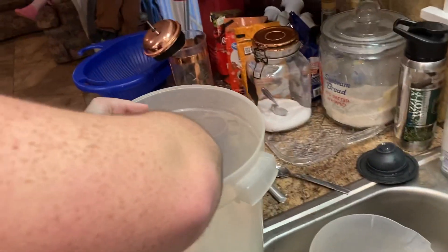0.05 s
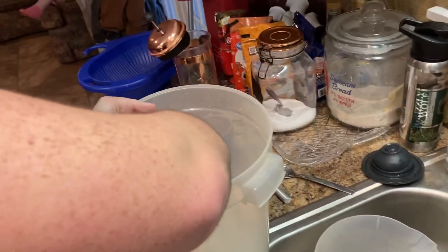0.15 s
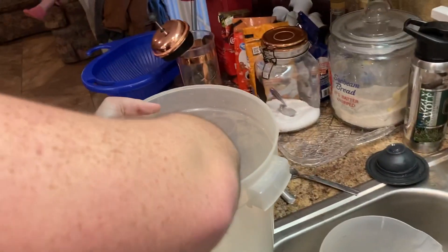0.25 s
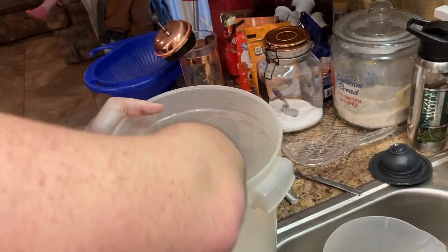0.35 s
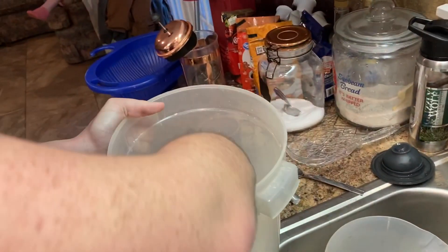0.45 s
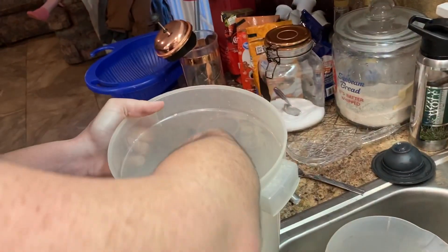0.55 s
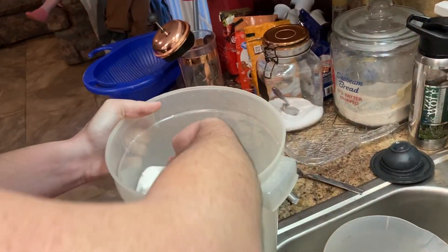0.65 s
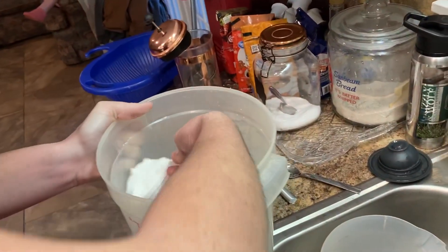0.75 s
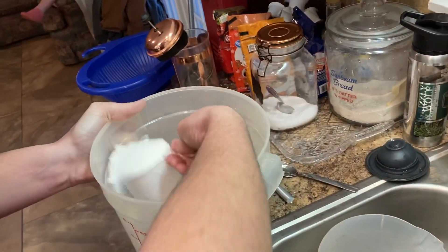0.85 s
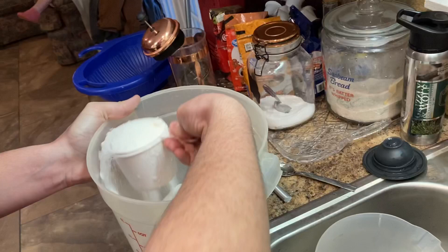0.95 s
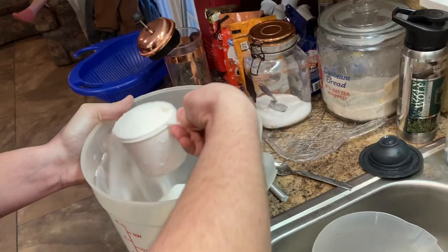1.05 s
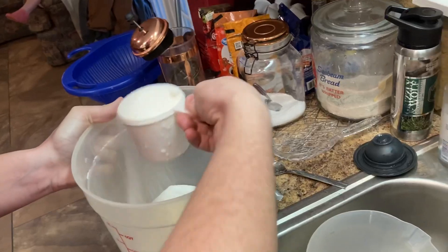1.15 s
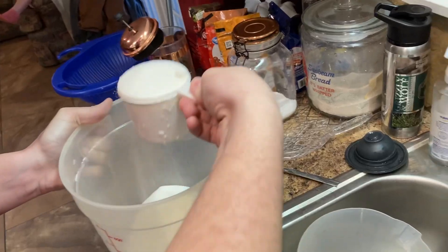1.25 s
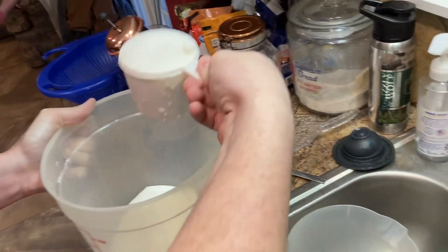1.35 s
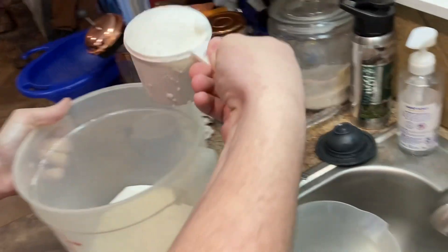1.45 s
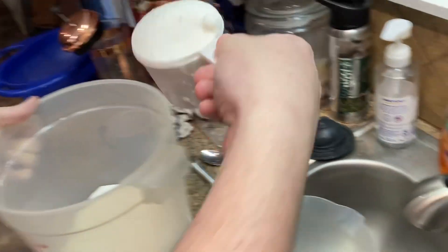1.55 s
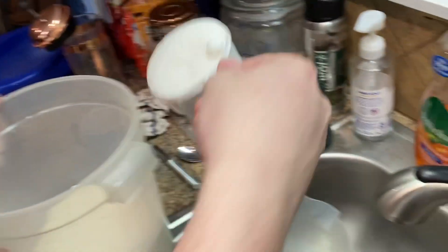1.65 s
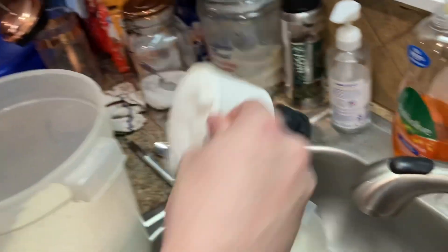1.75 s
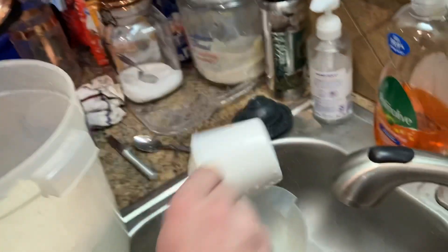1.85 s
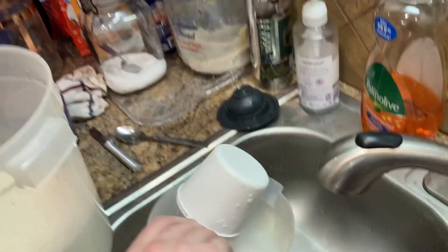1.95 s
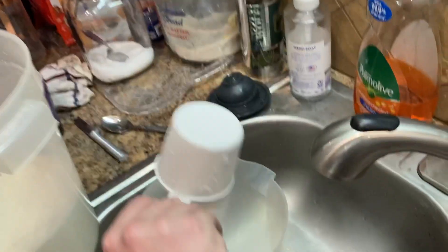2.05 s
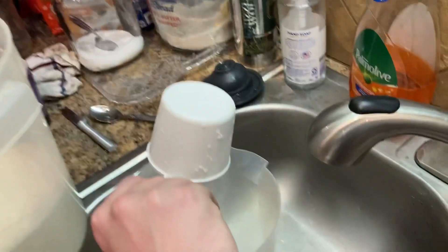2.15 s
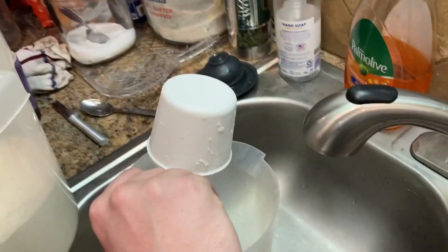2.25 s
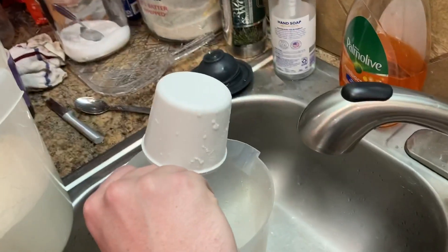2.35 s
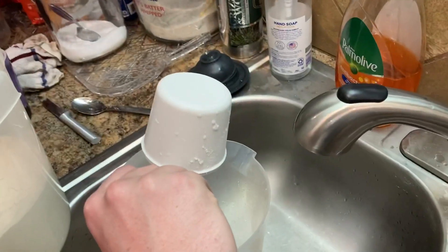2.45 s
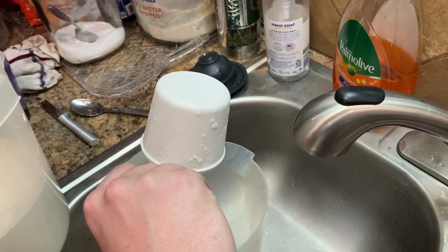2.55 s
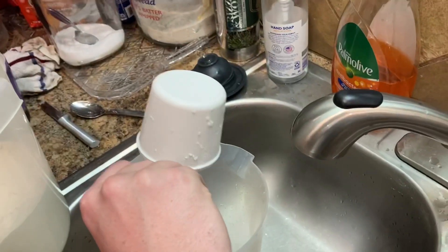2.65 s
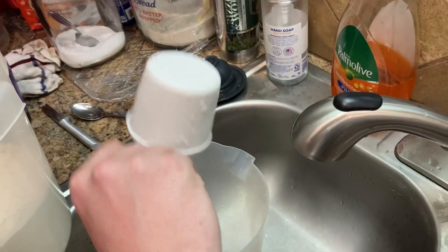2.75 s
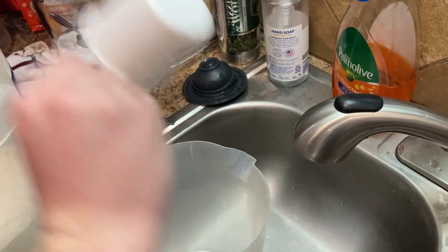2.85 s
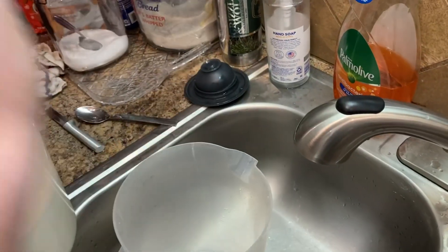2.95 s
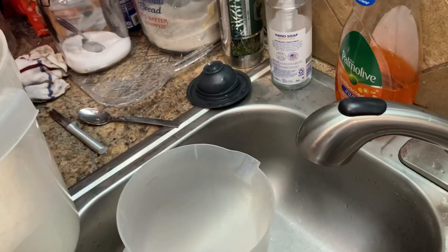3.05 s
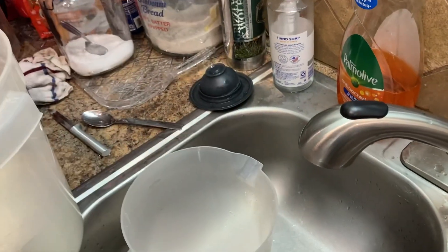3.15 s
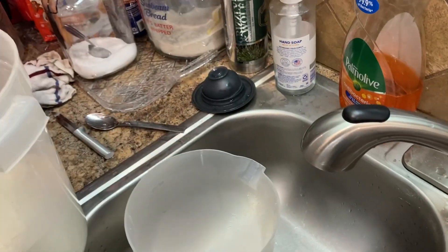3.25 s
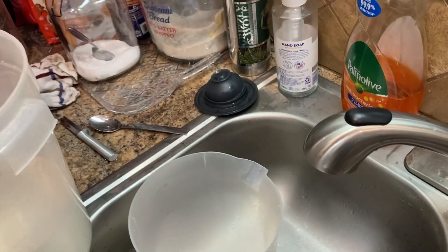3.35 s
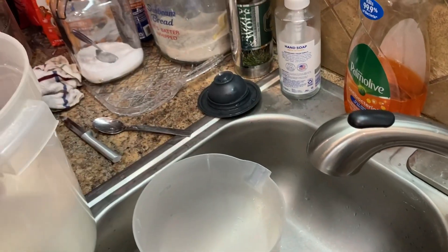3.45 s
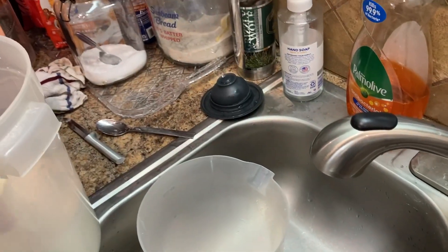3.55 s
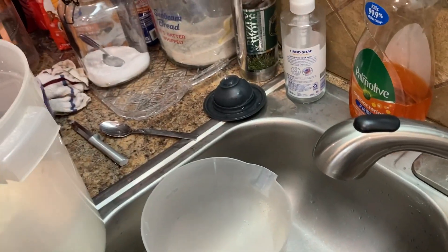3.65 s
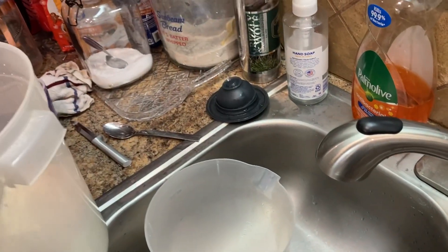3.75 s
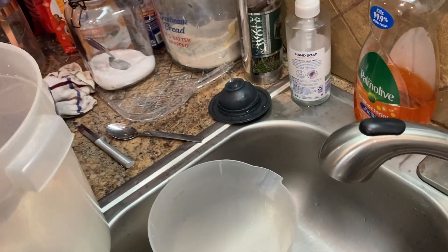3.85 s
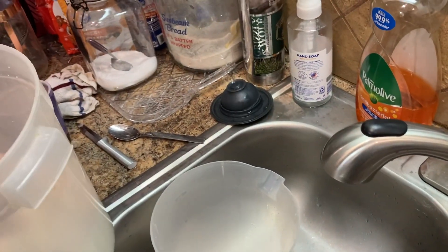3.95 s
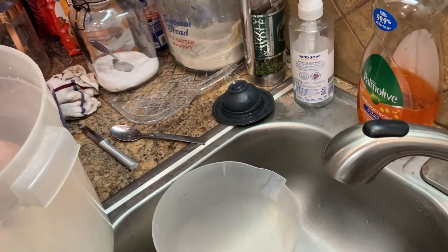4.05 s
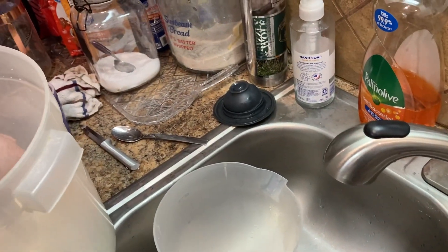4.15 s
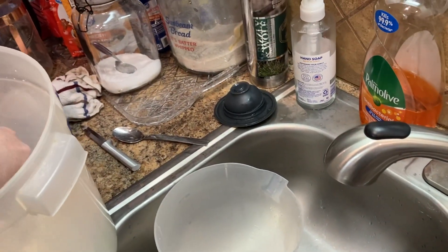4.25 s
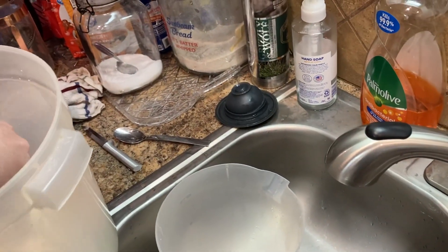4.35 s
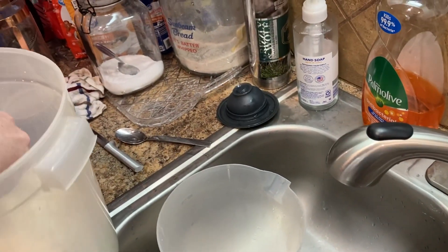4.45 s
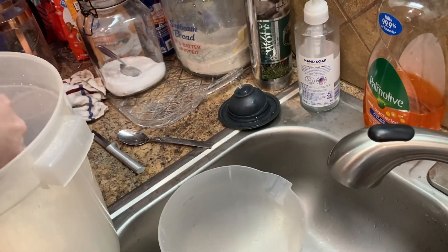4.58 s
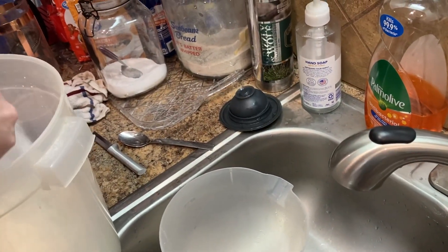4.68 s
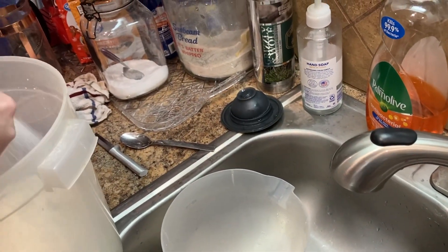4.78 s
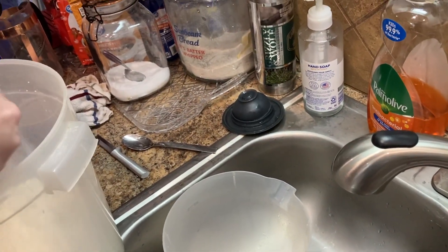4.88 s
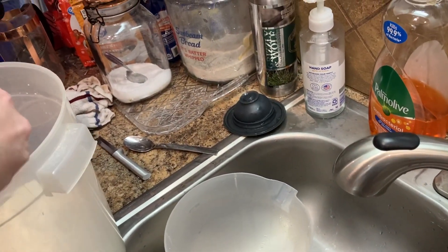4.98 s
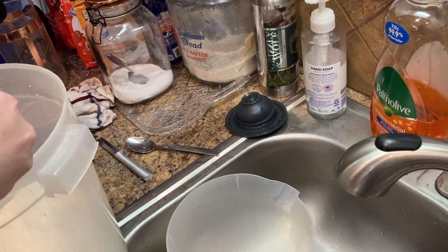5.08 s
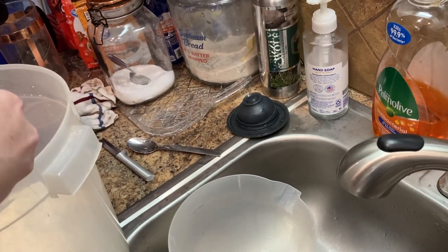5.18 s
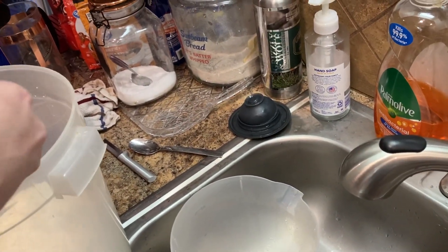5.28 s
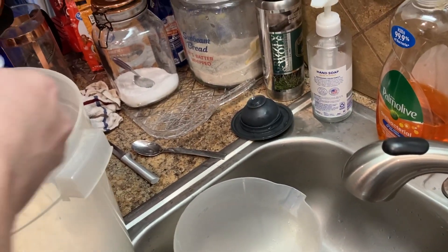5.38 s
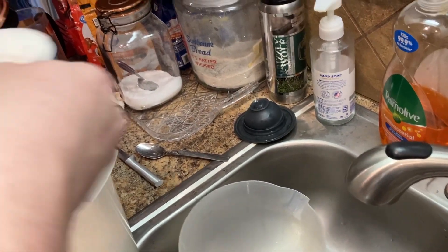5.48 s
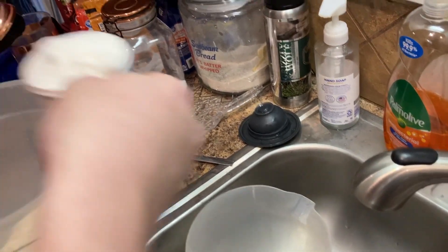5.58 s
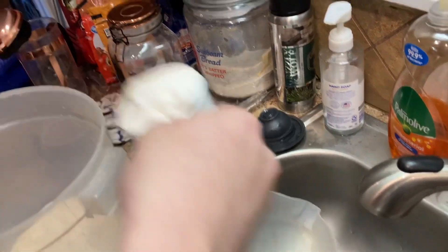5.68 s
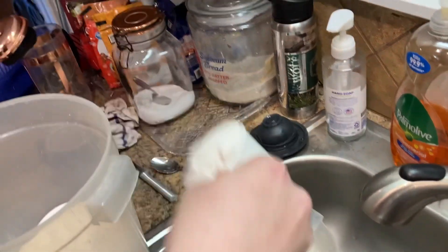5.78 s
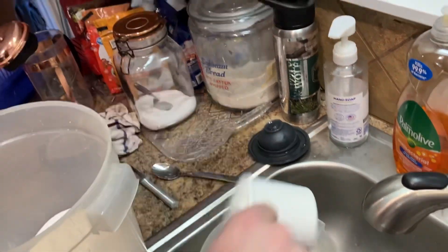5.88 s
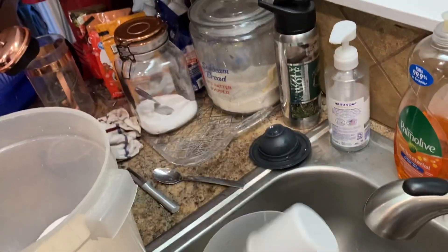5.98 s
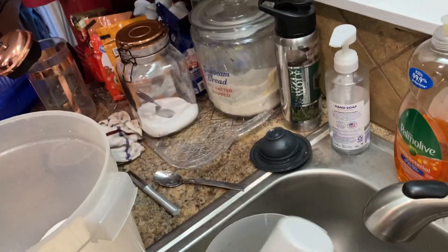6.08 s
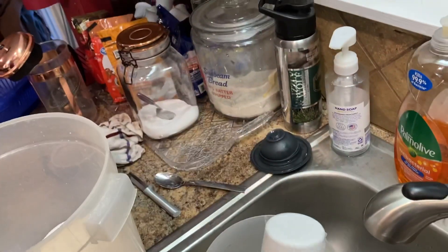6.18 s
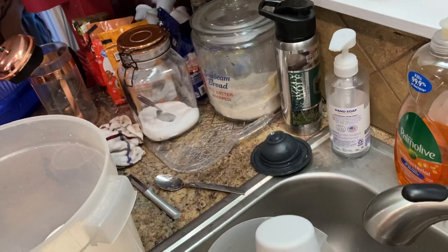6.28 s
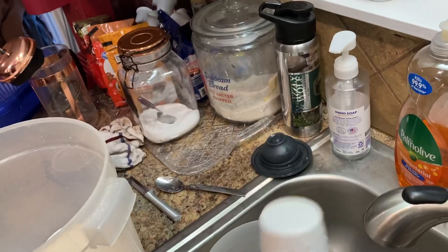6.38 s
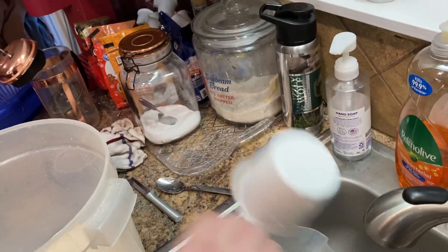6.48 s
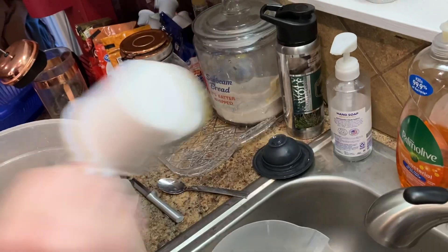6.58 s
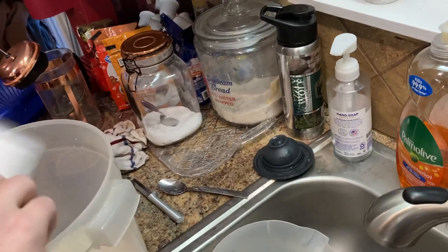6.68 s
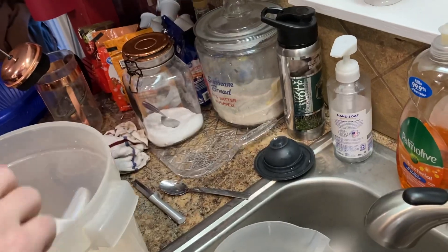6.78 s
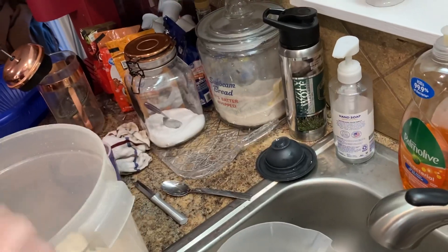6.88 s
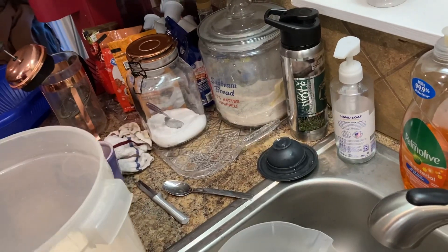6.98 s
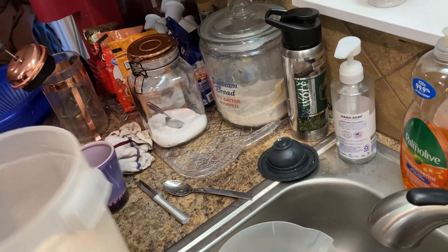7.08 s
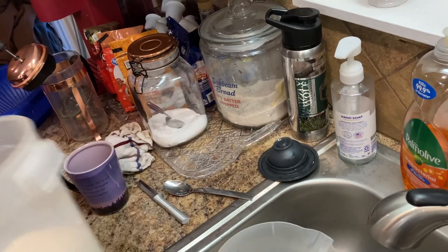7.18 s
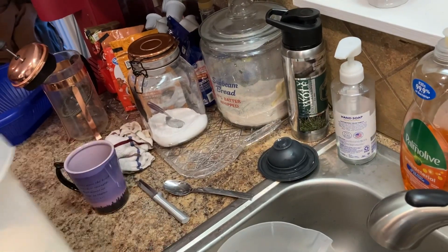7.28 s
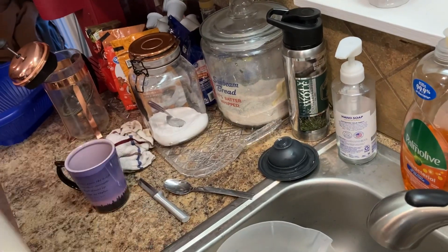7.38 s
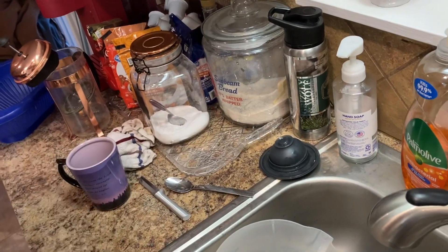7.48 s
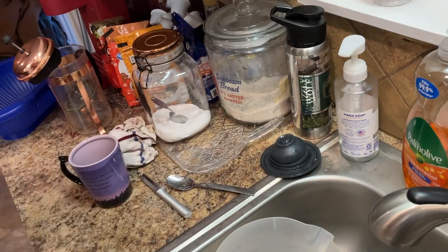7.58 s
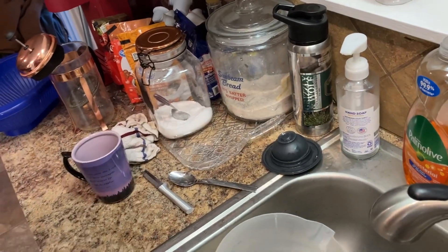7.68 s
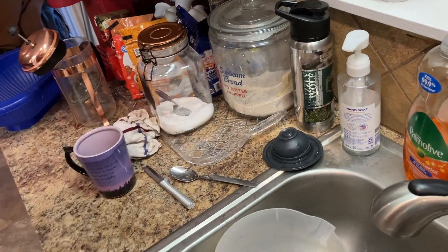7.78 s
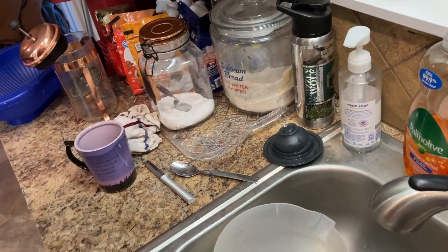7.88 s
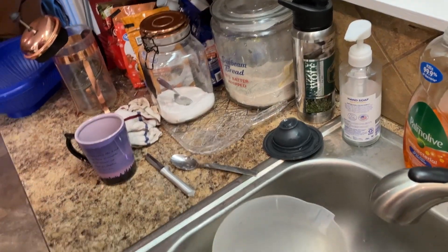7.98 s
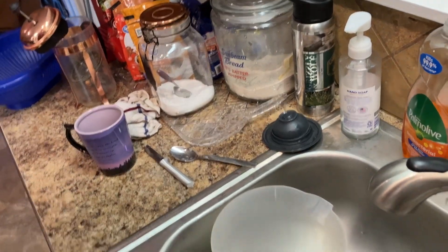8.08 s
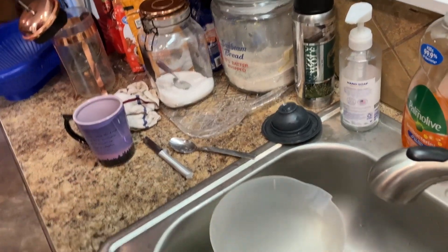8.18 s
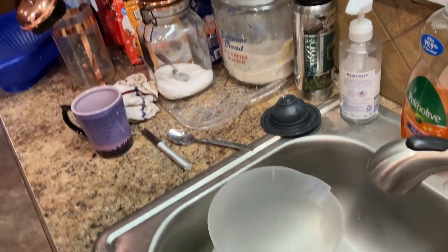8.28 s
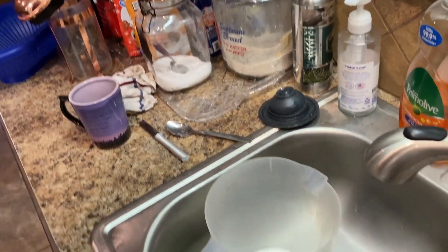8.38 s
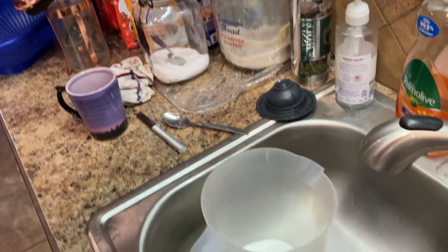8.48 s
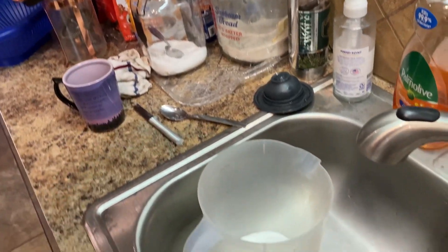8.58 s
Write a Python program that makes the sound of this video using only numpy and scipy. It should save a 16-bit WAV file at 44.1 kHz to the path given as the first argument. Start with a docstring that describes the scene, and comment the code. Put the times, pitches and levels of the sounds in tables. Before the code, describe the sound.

In a small kitchen with a soft refrigerator hum, a plastic cup crunches through granulated sugar in a large plastic tub, knocks its wall, then tips a hissing clump into a plastic pitcher, tapping its rim. A second, sharper scoop grinds with a gliding hollow note, knocks and pours again. The cup clatters loudly into the tub, which is pushed aside in brief pitched scuffs. Close stereo microphone, short room echo.

```python
"""A plastic cup digs granulated sugar out of a big plastic tub and tips it into a pitcher in a steel sink.
Grains are random tiny impacts, coloured or ringing the plastic: they hiss, crunch and slide off in clumps.
The cup knocks and rubs on the rims (snaps and rings) and the tub thumps on the counter (low damped tones).
At the end the cup is dropped into the tub and the tub is slid aside, in short bursts of pitched scuffs.
Echoes of a small kitchen surround it all, and steady tones and soft noise hum behind."""
import sys
import numpy as np
from scipy import signal
from scipy.fft import rfft, irfft, next_fast_len
from scipy.io import wavfile
from scipy.ndimage import map_coordinates

SR = 44100
rng = np.random.default_rng(int(sys.argv[2]) if len(sys.argv) > 2 else 0)


def put_to_file(sound):
    """Save the sound as 16-bit audio at rate SR, in the file named by the first command-line argument."""
    columns = np.atleast_2d(sound).T  # one column per channel
    safe = np.clip(columns, -1, 1)
    whole_steps = np.round(safe * 32767)
    wavfile.write(sys.argv[1], SR, whole_steps.astype(np.int16))


N = 380578  # length of the scene in samples

# Event levels below are those before the small gain in scene().
# pushes of the cup through the sugar: [full strength t/s, hold/s, rise/s, crunch level/dB, fizz level/dB]
DIG_STROKES = [(0.17, 0.05, 0.17, -46, -51), (0.37, 0.088, 0.077, -48, -50), (0.57, .15, 0.32, -48, -48),
               (0.8, 0.18, .1, -58.5, -67.5), (3.25, 0.006, 0.012, -49.5, -41),
               (3.355, 0.029, 0.064, -41, -40), (3.45, 0.31, 0.13, -45, -45),
               (3.92, 0.075, 0.16, -48, -55.5), (4.11, 0.185, 0.11, -46, -45.5),
               (4.4, 0.015, 0.01, -49.5, -57), (4.47, .05, 0.03, -54, -59.5), (4.8, 0.14, 0.33, -73.5, -80)]
# pushes hard enough to sound the cup's hollow note: [full strength t/s, hold/s, rise/s, level/dB]
HOLLOW_STROKES = [(.15, 0.12, 0.13, -55.5), (.56, 0.2, .1, -50), (3.355, 0.038, 0.018, -34),
                  (3.405, 0.01, 0.011, -38), (3.46, .06, .05, -44), (3.545, 0.041, .06, -39.5),
                  (3.705, 0.027, 0.074, -40.5), (3.92, .15, 0.11, -53), (4.09, 0.23, 0.11, -47.5),
                  (4.4, 0.015, 0.012, -44), (4.475, 0.038, 0.025, -52)]
# the hollow note sinks as the cup buries itself, rises as it comes free, drops as it is levelled: [t/s, f/Hz]
HOLLOW_GLIDE = [(.2, 1726), (3.352, 1996), (3.41, 1698), (3.561, 1050), (3.71, 385.2), (3.8, 382),
                (3.87, 1949), (4.301, 2285), (4.39, 756), (4.471, 1159), (4.529, 1208)]
# cluster of tones around the hollow note: [multiple of its pitch, level/dB]
HOLLOW_CLUSTER = [(.57, -3), (1, 0), (1.3, -6)]
# the cup brushes a plastic rim: [full strength t/s, hold/s, rise/s, rasp level/dB, rim ring level/dB]
BRUSH_STROKES = [(2.038, .014, 0.024, -45.5, -58), (4.316, 0.024, .02, -43, -51),
                 (4.512, 0.0056, 0.026, -49.5, -63), (5.038, 0.0079, 0.017, -48, -48.5)]
# loose sugar running off the cup: [full flow t/s, hold/s, rise/s, patter level/dB, fizz level/dB]
POUR_STROKES = [(1.32, 0.19, 0.12, -47.5, -69.5), (1.54, 0.11, 0.074, -41.5, -59.5),
                (1.88, 0.055, 0.097, -55, -43.5), (1.96, 0.15, 0.17, -54, -52.5),
                (2.87, 0.44, 0.12, -66.5, -80), (5.47, 0.13, 0.14, -67, -81),
                (5.858, 0.0176, 0.043, -65, -53.5), (5.93, .03, 0.032, -75, -55),
                (5.98, 0.035, .03, -48.5, -45.5), (6.06, .06, .04, -67, -56), (6.18, 0.011, 0.04, -57, -53)]
# clumps letting go and landing: [t/s, level/dB, rise/s, time to fall 60 dB/s,
# cup ring level/dB before a 2 dB lift, tub ring level/dB, pitcher ring level/dB]
CLUMP_FALLS = [(0.477, -32.5, 0.0056, 0.29, 2.5, -15, -30), (1.031, -49.5, 0.017, 0.3, -16, -2, -5),
               (1.189, -29.5, 0.013, .24, -15, 8, -27), (2.202, -32, 0.0028, 0.083, -22, -34, -23),
               (2.417, -30.5, 0.0098, 0.38, -23, -30, 3.5), (3.226, -40, .0058, 0.25, -31, 3, -28),
               (5.967, -35.5, 0.0029, 0.089, -18, -28.5, -10.5),
               (6.621, -33.5, 0.012, 0.2, -21.5, 12.5, -25)]
# hard plastic contacts: [t/s, level/dB, tub body level/dB, time for the chatter to fall 60 dB/s,
# rim ring level/dB, rim f/Hz]
CONTACTS = [(0.671, -22, -5, 0.043, -6, 1700), (0.744, -33.5, -15, .015, -1.5, 1980),
            (0.902, -42.5, -12.5, .03, -14, 2300), (2.0073, -29.5, -6.5, .015, -7, 1580),
            (2.067, -21, -13, 0.044, -4.5, 1620), (2.123, -39, 3, 0.035, -3, 1628),
            (2.206, -29.5, -7, .06, 0.5, 1510), (3.405, -23, 5.5, 0.064, 1, 1450),
            (3.415, -28, 5.5, .04, 1.5, 1790), (4.2936, -13, -7, 0.012, -3, 2290),
            (4.2995, -21.5, -1.5, .03, 1, 1500), (4.396, -36, 8.5, 0.062, 3.5, 982),
            (4.415, -34.5, 5, .06, -7, 1050), (4.567, -35.5, -10, .035, -13, 2366),
            (5.775, -51.5, -12, 0.019, -10, 2300), (5.9701, -27.5, 1.5, 0.058, -10, 1400),
            (6.122, -34.5, -7, 0.028, -12, 2510), (6.568, -46, -5.5, 0.14, -5, 2400),
            (6.638, -13, 6.5, 0.04, -2.5, 2060), (6.646, -8.5, 0, 0.03, -3.5, 908),
            (6.652, -13.5, 2.5, .03, 2.5, 1255), (6.6987, -4.5, -5.5, 0.02, -12.5, 2410),
            (6.7016, -12, -1.5, .07, -11, 1950), (6.727, -16.5, -7.5, 0.15, -14.5, 2350),
            (6.7355, -25.5, -6, .08, -9, 2350), (6.8114, -6, -8, 0.028, 0.5, 2240),
            (8.241, -34, 5, 0.034, 3, 1050), (8.322, -33, 1, 0.061, 5, 1650),
            (8.588, -38, -1.5, .025, 7, 1050)]
# soft blows that flex the tub or the sink: [t/s, level/dB, lowest mode f/Hz, upper modes level/dB]
SOFT_BLOWS = [(0.502, -30.5, 111.4, -2), (0.532, -18, 106.7, -5), (1.912, -23.5, 112.6, -18),
              (1.957, -20.5, 82.3, -14.5), (1.983, -27.5, 52.1, -2), (2.062, -31.5, 75, -15),
              (2.16, -29.5, 106.3, -6), (2.275, -30.5, 129, -13), (3.237, -23.5, 326, -17),
              (4.396, -23, 140.4, -4), (4.4024, -13, 109.7, -9), (4.41, -26, 53.8, -3),
              (4.463, -47, 124, 5), (4.495, -38.5, 124, 2.5), (4.538, -21.5, 105, -18),
              (5.985, -26, 101.9, -6.5), (6.01, -30.5, 55, -18), (6.643, -21, 330, -24),
              (6.646, -16, 109, -20), (6.7, -18, 527, -19), (6.703, -27, 110.6, -5),
              (6.813, -21.5, 335, -9), (6.815, -27.5, 105.6, -11), (8.247, -30, 170.8, -19),
              (8.296, -31.5, 101.3, -5.5), (8.382, -29, 106, -4), (8.414, -25, 104.8, -8)]
# upper modes of a flexing wall, varied a little per blow: [multiple of the lowest mode, level/dB]
FLEX_MODES = [(1.45, -5), (2.0, 0), (3.0, -11)]
# shoves of the tub along the counter: [full strength t/s, hold/s, rise/s, level/dB, base pitch f/Hz]
SHOVES = [(8.217, 0.014, 0.043, -50.5, 1080), (8.245, .02, 0.0105, -43, 1034),
          (8.286, 0.016, .02, -46, 1044), (8.314, 0.022, .02, -41, 1025), (8.364, 0.0168, 0.011, -45, 1026),
          (8.584, .008, 0.008, -46, 1050)]

# resonances of the tub wall, varied a little per knock: [f/Hz, width/Hz, level/dB]
TUB_MODES = [(354, 130, 0), (521, 35, -4.5), (908, 75, 5.5), (1229, 52, 1.5), (1580, 520, -2.5),
             (2180, 530, 3), (2620, 34, -9.5), (3180, 55, -1.5), (3480, 70, -6), (3835, 90, -12),
             (4155, 50, -5.5), (4860, 2100, -25)]
# resonances of the tub when clumps land in it: [f/Hz, width/Hz, level/dB]
TUB_SPILL_MODES = [(564, 35, -2.5), (930, 120, 0), (1050, 100, 1), (1890, 130, -4), (2315, 70, 2.5),
                   (3590, 130, -2.5), (4950, 160, -6.5), (5800, 250, -11)]
# resonances of the cup: [f/Hz, width/Hz, level/dB]
CUP_MODES = [(920, 48, -5), (1400, 55, -7.5), (2640, 70, -5.5), (3150, 65, -9), (3840, 30, 5),
             (4760, 80, -6.5), (6100, 130, -2), (6470, 54, -4.5), (7130, 190, -2), (8090, 200, -6.5),
             (10100, 200, -6.5), (11650, 230, -8)]
# resonances of the pitcher: [f/Hz, width/Hz, level/dB]
PITCHER_MODES = [(975, 50, 9), (1193, 88, 2.5), (2300, 83, 5.5), (3295, 36, -5), (6500, 60, -6.5)]
# resonances of the tub's base: [multiple of its pitch, width/Hz, level/dB]
BASE_MODES = [(.45, 250, -13), (.88, 120, -5), (1, 110, 0), (1.1, 130, -3), (1.7, 450, -9)]
# close cluster in which a rim rings: [multiple of its pitch, width as a share of its pitch, level/dB]
RIM_MODES = [(.93, .07, -5), (1, .05, 0), (1.09, .06, -7)]

# colour of crunching and pattering sugar: [f/Hz, level per Hz/dB]
CRUNCH_COLOUR = [(150, -13.5), (400, 4), (680, 2.5), (950, 2), (1500, 2), (2300, 0.5), (3300, -9.5),
                 (5000, -13), (16000, -43.5)]
# colour of hissing grains: [f/Hz, level per Hz/dB]
FIZZ_COLOUR = [(500, -34.5), (2500, -3.5), (4200, -5), (6500, -0.5), (9500, -4.5), (12000, -0.5),
               (16000, -14)]
# colour of a landing clump, and of grit under the tub: [f/Hz, level per Hz/dB]
CLUMP_COLOUR = [(100, -26.5), (350, 1.5), (700, -6), (2000, -2), (4500, -6), (7000, -3), (10000, -8),
                (13000, -10.5), (16000, -23)]
# colour of a hard contact: [f/Hz, level per Hz/dB]
CRACK_COLOUR = [(100, -22), (600, -4.5), (2000, 9), (4000, 3), (8000, 0.5), (10500, -0.5), (13000, -7.5),
                (16000, -19.5)]
# colour of the soft fan noise: [f/Hz, level per Hz/dB]
AIR_COLOUR = [(20, -28), (45, -5), (65, 0), (100, 0), (160, -12), (240, -2), (300, -7), (450, -14),
              (800, -20), (1200, -26), (2200, -33), (4500, -45), (12000, -54), (16000, -66)]
# refrigerator hum, each tone slightly unsteady: [f/Hz, rms level/dB]
HUM_TONES = [(59.2, -55.5), (118.6, -54.5), (238, -57), (296, -70.5), (356, -69.5)]

# how slowly the kitchen's late echo dies: [f/Hz, time to fall 60 dB/s]
LATE_DECAY = [(100, .35), (500, .5), (1500, .58), (2500, .64), (5000, .58), (9000, .48), (14000, .34)]
# how loud the echo is: [f/Hz, level/dB]
ECHO_COLOUR = [(100, -12), (400, -7), (1200, -4), (2500, -4), (6000, -5), (10000, -8), (16000, -11)]
# how far the left of two microphone ports leads, before scaling by side: [f/Hz, phase/radians]
LEFT_LEAD = [(0, 0), (110, -.4), (250, .1), (400, .25), (1000, 1.3), (1700, 2.9), (2100, 4.3), (2900, 5.2),
             (5400, 9.4), (7100, 6.28), (9150, 3.14), (11350, 0), (13600, -3.14), (15700, -6.28)]
# likeness of diffuse sound at the two ports: [f/Hz, likeness from 0 to 1]
LIKENESS = [(120, 0.61), (300, 0.77), (600, 0.37), (1000, 0.31), (16000, 0.9)]

TOP_HZ = 15900  # band limit
# every stroke of the hand swells to its level, sags while it lasts and dies away
SWELL_DB, SAG_DB_PER_S, RELEASE_DB_PER_S = 17.5, 13, 191.5
POUR_RELEASE_DB_PER_S = 310  # a stream stops this fast
STICK_DB_PER_S = 331.5  # a rub dies this fast once the plastic sticks again
SURGE_DB, SURGES_PER_S = 2, 28  # packed sugar gives way in uneven surges
FLUTTER_DB, FLUTTERS_PER_S = 1.2, 45  # a running stream of sugar thickens and thins
BRUSH_HZ, BRUSH_FIZZ_DB = 2310, -8.5
RIM_ECHO_DB = -5.5  # the rim sends less into the kitchen than towards the ports
KNOCK_ECHO_DB = 0.5  # level of the knocks sent out into the kitchen
SUGAR_SPREAD = 0.36  # grains land all over the wall: part of their sound that differs between the ports
CHATTER_SPREAD = 0.52  # part of a knock's chatter that differs between the ports
# a flex builds up and falls by 60 dB within a set number of its own cycles
FLEX_RISE_CYCLES, FLEX_LIFE_CYCLES = .65, 18
ROCK_S, ROCK_DB = .066, -21  # the wall rocks back once, this much later and weaker


def amp(db):
    """Turn decibels into gain."""
    return 10 ** (np.asarray(db) / 20)


def unit(x):
    """Scale to rms 1."""
    return x / np.sqrt(np.mean(x ** 2) + 1e-20)


def along(points, hz):
    """Read a curve of (f, value) points on a log frequency axis."""
    f, v = np.transpose(points)
    return np.interp(np.log(hz + 1), np.log(f + 1), v)


def wobble(rate):
    """A smooth random curve with this many knots a second."""
    knots = rng.standard_normal(int(N * rate / SR) + 4)
    return map_coordinates(knots, [np.arange(N) * rate / SR])


def filtered(x, response):
    """Filter x by a complex response of frequency."""
    n = x.shape[-1]
    m = next_fast_len(n + 8192)
    return irfft(rfft(x, m) * response(np.fft.rfftfreq(m, 1 / SR)), m)[..., :n]


def coloured(x, spectrum):
    """Colour x without smearing it backwards in time, keeping the power of white noise."""
    size = 2048
    gain = unit(amp(along(spectrum, np.fft.rfftfreq(size, 1 / SR))))
    # folding the cepstrum gives a filter that acts as early as possible
    cepstrum = irfft(np.log(gain))
    cepstrum[1:size // 2] *= 2
    cepstrum[size // 2 + 1:] = 0
    return signal.fftconvolve(x, irfft(np.exp(rfft(cepstrum))))[:len(x)]


def ring(x, modes):
    """Pass x through a set of resonances, keeping the power of white noise."""
    def response(f):
        h = 0
        for k, (centre, width, db) in enumerate(modes):
            damping = 1j * f * width
            h = h + (-1) ** k * amp(db) * damping / (centre * centre - f * f + damping)
        return h / np.sqrt(np.mean(np.abs(h) ** 2))
    return filtered(x, response)


def grains(rate, spread_db, size=N):
    """Tiny impacts at random moments, rate a second on average, of very mixed sizes, rms 1."""
    hits = np.sqrt(rng.poisson(rate / SR, size)) * rng.standard_normal(size)
    return unit(hits * amp(spread_db * rng.standard_normal(size)))


def add(track, s, sound):
    """Mix a sound into the track at time s."""
    part = track[round(s * SR):][:len(sound)]
    part += sound[:len(part)]


def strokes(rows, axis=3, release=RELEASE_DB_PER_S):
    """Gain of a series of strokes (swell, sagging hold, release) at the levels in one dB column."""
    power = np.zeros(N + SR)  # starts half a second early, to fit the first swell
    t = np.arange(-SR // 2, SR) / SR
    for row in rows:
        s, hold, rise = row[:3]
        swell = SWELL_DB * np.minimum(t, 0) / rise
        sag = SAG_DB_PER_S * np.maximum(t, 0)
        fade = release * np.maximum(t - hold, 0)
        add(power, s, amp(row[axis] + swell - sag - fade) ** 2)
    return np.sqrt(power[SR // 2:][:N])


def patchy(x, depth_db, patch_hz=450, patch_s=.05):
    """Shift the colour in short patches, each band swelling and fading on its own."""
    hz, t, z = signal.stft(x, SR, nperseg=512)
    knots = rng.standard_normal((len(hz), len(t)))
    places = np.meshgrid(hz / patch_hz, t / patch_s, indexing="ij")
    field = map_coordinates(knots, places, order=1, mode="mirror")
    shifted = signal.istft(z * amp(depth_db * unit(field)), SR, nperseg=512)[1][:len(x)]
    return np.std(x) * unit(shifted)


def digging():
    """Crystals grind past the cup in small slips and ring thin plastic; the colour shifts as the heap gives."""
    slips = amp(1.3 * wobble(70))
    crunch = amp(-4.0) * coloured(grains(rate=2000, spread_db=1.5), CRUNCH_COLOUR)
    crunch += amp(-5) * ring(grains(rate=2500, spread_db=-0.5), TUB_MODES)
    fizz = amp(1.0) * coloured(grains(rate=20000, spread_db=1), FIZZ_COLOUR)
    fizz += amp(-8.5) * ring(grains(rate=5600, spread_db=5), CUP_MODES)
    surges = amp(SURGE_DB * wobble(SURGES_PER_S))
    scrape = strokes(DIG_STROKES, axis=3) * surges * crunch + strokes(DIG_STROKES, axis=4) * fizz
    return slips * patchy(scrape, depth_db=2)


def hollow(width_hz=170):
    """Coarse, uneven crunches sound the cup's gliding cluster of resonances."""
    slips = amp(2.5 * wobble(90))
    pitch = np.interp(np.arange(N) / SR, *np.transpose(HOLLOW_GLIDE))
    phase = 2 * np.pi * np.cumsum(pitch) / SR
    note = np.zeros(N)
    for k, db in HOLLOW_CLUSTER:
        crunches = slips * grains(rate=2200, spread_db=2)
        # slow noise on a sine makes a narrow band of noise around its pitch
        band = filtered(crunches, lambda hz: 1 / (1 + 1j * hz / width_hz) ** 2)
        note += amp(db) * unit(band) * np.sin(k * phase)
    return strokes(HOLLOW_STROKES, release=STICK_DB_PER_S) * unit(note)


def brushing():
    """A light rub with grains under it rasps on the wall and makes the rim sing briefly."""
    rim_modes = [(BRUSH_HZ, 150, 0), (1.09 * BRUSH_HZ, 170, -3)]  # f/Hz, width/Hz, level/dB
    rim = ring(grains(rate=9000, spread_db=1), rim_modes)
    wall = amp(-4) * ring(grains(rate=6000, spread_db=2), [(BRUSH_HZ, 1600, 0)])
    grit = amp(BRUSH_FIZZ_DB) * coloured(grains(rate=6100, spread_db=2.5), FIZZ_COLOUR)
    rasp_gain = strokes(BRUSH_STROKES, axis=3, release=STICK_DB_PER_S)
    rim_gain = strokes(BRUSH_STROKES, axis=4, release=STICK_DB_PER_S)
    return rasp_gain * (wall + grit) + rim_gain * rim


def pouring():
    """A thin stream patters on a plastic wall and hisses on the heap."""
    patter = amp(-3.5) * coloured(grains(rate=8000, spread_db=2.5), CRUNCH_COLOUR)
    patter += amp(-13.5) * ring(grains(rate=4700, spread_db=4.5), PITCHER_MODES)
    fizz = amp(-3.0) * coloured(grains(rate=20000, spread_db=2.5), FIZZ_COLOUR)
    flutter = amp(FLUTTER_DB * wobble(FLUTTERS_PER_S))
    patter_gain = strokes(POUR_STROKES, axis=3, release=POUR_RELEASE_DB_PER_S)
    fizz_gain = strokes(POUR_STROKES, axis=4, release=POUR_RELEASE_DB_PER_S)
    return flutter * (patter_gain * patter + fizz_gain * fizz)


def spills(linger=1.22):
    """A clump lands as a sudden shower that thins out; stragglers keep the vessel ringing a little longer."""
    out, t = np.zeros(N), np.arange(SR // 2) / SR

    def shower(rise, life):
        """Grains that build up quickly and thin out by 60 dB over their life."""
        envelope = (1 - np.exp(-(t / rise) ** 2)) * amp(-60 * t / life)
        return envelope * grains(rate=14000, spread_db=2.0, size=len(t))

    for s, db, rise, t60, cup_db, tub_db, pitcher_db in CLUMP_FALLS:
        cup = amp(cup_db + 2.0) * ring(shower(rise, t60), CUP_MODES)
        stragglers = amp(-7.5) * shower(rise, linger * t60)
        tub = amp(tub_db) * ring(stragglers, TUB_SPILL_MODES)
        pitcher = amp(pitcher_db) * ring(stragglers, PITCHER_MODES)
        landing = coloured(shower(rise, t60), CLUMP_COLOUR)
        add(out, s, amp(db) * (landing + cup + tub + pitcher))
    return out


def knocks(snap_s=0.0024, chatter_db=-14, give_s=0.00017, bend=1.1):
    """Each contact snaps, chatters briefly and rings; where it lands decides how strongly each tub mode rings.
    Gives the sound at the left and right ports, and that sent all round, in which the chatter averages out."""
    out, t = np.zeros((3, N)), np.arange(SR // 4) / SR
    click = 1. * (t == 0)
    # bending waves carry the treble of a snap through the wall ahead of its bass
    snap = filtered(click, lambda hz: np.exp(-1j * bend * np.sqrt(hz)))
    for s, db, body_db, t60, rim_db, rim_hz in CONTACTS:
        burst = amp(-17.5) * np.exp(-t / snap_s)
        chatter = amp(chatter_db) * amp(-60 * t / t60)
        shape = (burst + chatter) * (1 - np.exp(-t / give_s))  # the plastic gives a little at first
        shared, apart = shape * rng.standard_normal((2, len(t)))
        left, right = amp(6.0) * snap + shared + CHATTER_SPREAD * np.array([apart, -apart])
        all_round = amp(KNOCK_ECHO_DB) * np.linalg.norm(shape) * snap
        tub = [(hz * (1 + .005 * rng.normal()), width, level + 2.5 * rng.normal())
               for hz, width, level in TUB_MODES]
        rim_modes = [(k * rim_hz, share * rim_hz, level) for k, share, level in RIM_MODES]
        rim = ring(np.linalg.norm(left) * snap, rim_modes)
        for track, blow, send_db in zip(out, (left, right, all_round), (0, 0, RIM_ECHO_DB)):
            body = amp(body_db) * ring(blow, tub)
            add(track, s, amp(db) * (coloured(blow, CRACK_COLOUR) + body + amp(rim_db + send_db) * rim))
    return out


def thumps():
    """A wall loaded with sugar flexes in a few low, quickly damped modes and rocks back."""
    out, t = np.zeros(N), np.arange(SR // 2) / SR
    for s, db, hz, upper_db in SOFT_BLOWS:
        cycles = hz * t
        flex = np.sin(2 * np.pi * cycles)
        for k, level in FLEX_MODES:
            level_chance, pitch_chance = rng.standard_normal(2)
            tone = np.sin(2 * np.pi * cycles * k * (1 + 0.048 * pitch_chance))
            flex += amp(upper_db) * amp(level + 2 * level_chance) * tone
        build_up = 1 - np.exp(-(cycles / FLEX_RISE_CYCLES) ** 2)
        blow = amp(db) * flex * build_up * amp(-60 * cycles / FLEX_LIFE_CYCLES)
        add(out, s, blow)
        add(out, s + ROCK_S, amp(ROCK_DB) * blow)
    return out


def sliding():
    """The tub's base judders over stray grains on the counter, each scuff at its own pitch."""
    out = np.zeros(N)
    grit = amp(-14) * coloured(grains(rate=9000, spread_db=2), CLUMP_COLOUR)
    slips = grains(rate=5000, spread_db=2)
    for row in SHOVES:
        base = [(k * row[4], width, level) for k, width, level in BASE_MODES]
        out += strokes([row], release=STICK_DB_PER_S) * (ring(slips, base) + grit)
    return out * amp(SURGE_DB * wobble(70))


def ports(pair, side):
    """Direct sound reaches the two ports out of step; side is near 1 for the left, near -1 for the right."""
    def shift(hz):
        lead = side * np.interp(hz, *np.transpose(LEFT_LEAD))
        return np.exp(.5j * np.array([lead, -lead]))
    return filtered(np.array(pair), shift)


def diffuse(pair):
    """Blend two unrelated signals so that the two ports hear them as alike as the table says."""
    def blend(hz):
        turn = np.arccos(np.clip(along(LIKENESS, hz), -1, 1)) / 2
        return np.array([np.cos(turn), np.sin(turn)])
    mid, side = filtered(pair, blend)
    return np.array([mid + side, mid - side])


def kitchen(x, early_t60=0.072, count=28):
    """Tub, sink and walls answer at once, a weak tail dies slowly; the pattern changes as things move about."""
    noise = rng.standard_normal((count, 2, 2 * SR // 3))
    hz, t, z = signal.stft(noise, SR, nperseg=256)
    late = signal.istft(z * amp(-60 * t / along(LATE_DECAY, hz)[:, None]), SR, nperseg=256)[1]
    t = np.arange(late.shape[-1]) / SR
    early = rng.standard_normal(late.shape) * amp(-60 * t / early_t60)
    tails = (amp(-1.5) * unit(early) + amp(-8) * unit(late)) / np.sqrt(len(t))
    echo, start = np.zeros((2, N)), .002  # the echo starts 2 ms late
    # each stretch of sound gets its own random echo pattern
    for piece, tail in zip(np.array_split(x, count), tails):
        for port, answer in zip(echo, signal.fftconvolve(piece[None], tail, axes=1)):
            add(port, start, answer)
        start += len(piece) / SR
    return diffuse(filtered(echo, lambda f: amp(along(ECHO_COLOUR, f))))


def background():
    """A refrigerator's slightly unsteady hum, made of sine tones, over soft fan noise."""
    t = np.arange(N) / SR
    hum = np.zeros(N)
    for hz, db in HUM_TONES:
        level = np.sqrt(2) * amp(db + 1.1 * wobble(2.6))
        hum += level * np.sin(2 * np.pi * hz * t + .5 * wobble(3.7))
    air = unit(filtered(rng.standard_normal((2, N)), lambda hz: amp(along(AIR_COLOUR, hz))))
    return hum + amp(-52.3 + .7 * wobble(1.5)) * diffuse(air)


def scene():
    """The scooping sounds come from the left, the last scrape from the right; the kitchen surrounds both."""
    # two separate draws of the sugar: one shared by the ports, one that differs between them
    shared, apart = [(digging() + pouring() + spills()) / np.hypot(1, SUGAR_SPREAD) for draw in range(2)]
    sugar = shared + SUGAR_SPREAD * np.array([apart, -apart, apart])
    left, right, all_round = amp(1.0) * (sugar + hollow() + thumps() + brushing() + knocks())
    scrape = amp(1.0) * sliding()
    direct = ports([left, right], side=0.98) + ports([scrape, scrape], side=-0.84)
    return direct + kitchen(all_round + scrape) + background()


def record(dry):
    """The right port has a little more bass; nothing is kept above the band limit."""
    def response(hz):
        lean = along([(130, 1), (400, .2), (2000, 0.0068)], hz)  # f/Hz, level/dB
        return amp(np.array([-lean, lean])) * (hz < TOP_HZ)
    return filtered(dry, response)


dry = scene()
out = record(dry)
put_to_file(out)
```